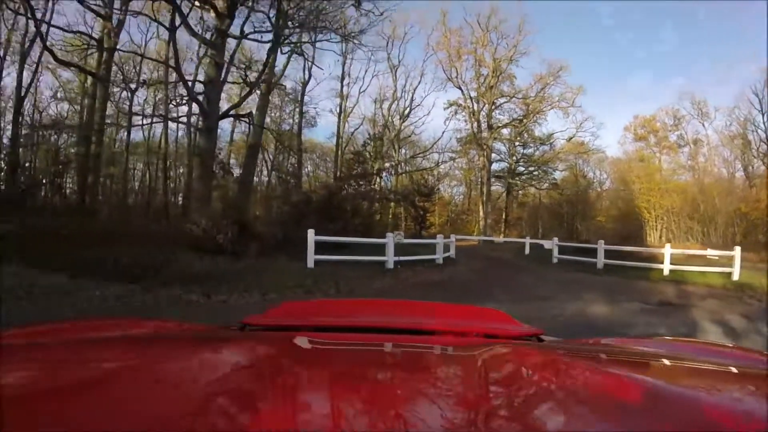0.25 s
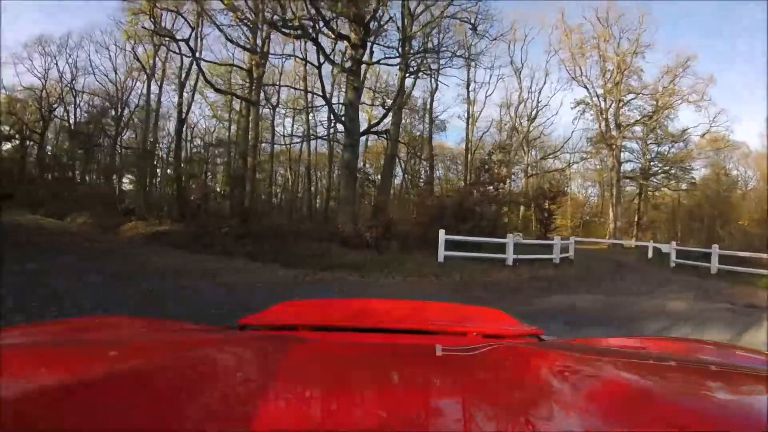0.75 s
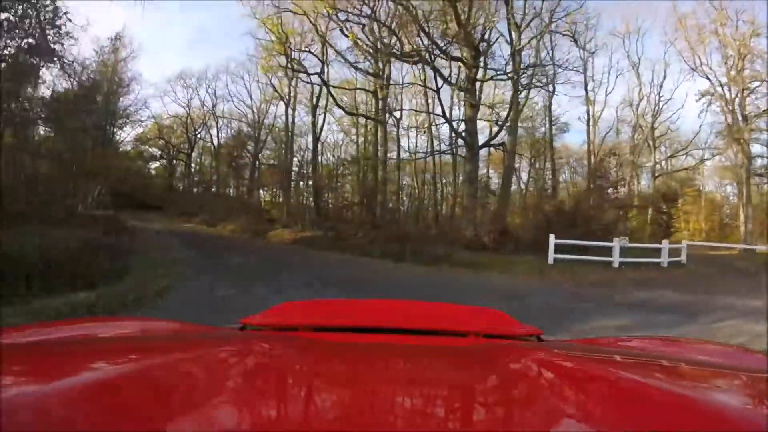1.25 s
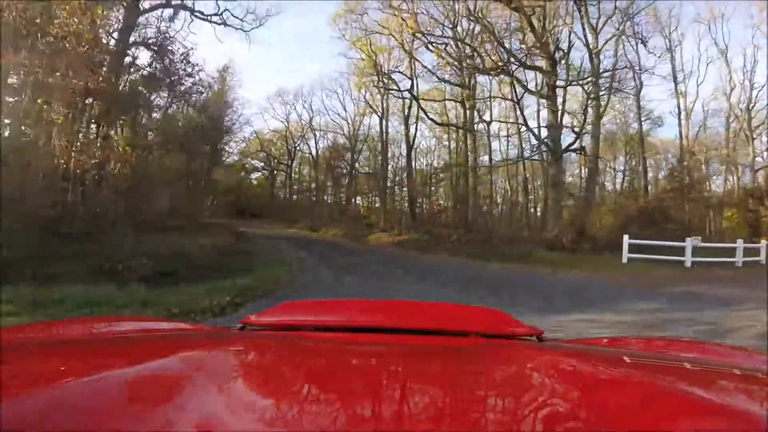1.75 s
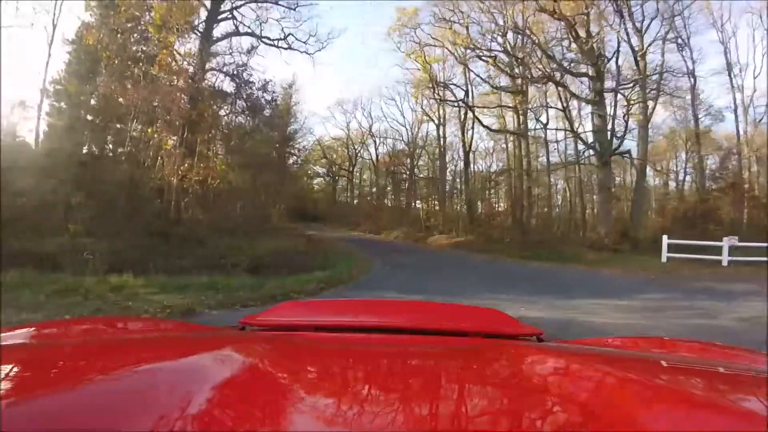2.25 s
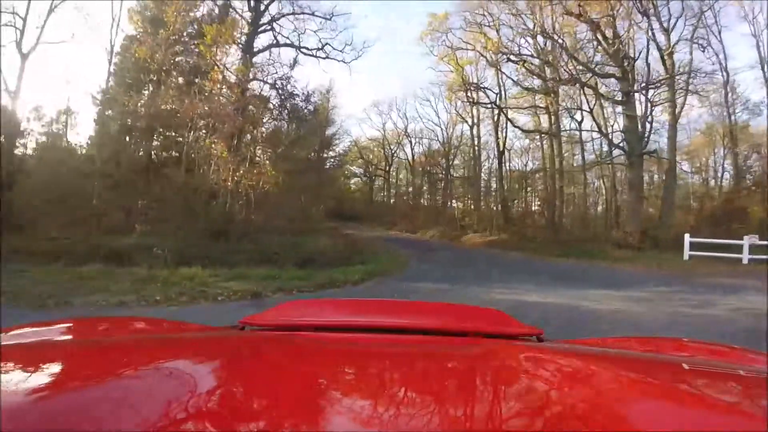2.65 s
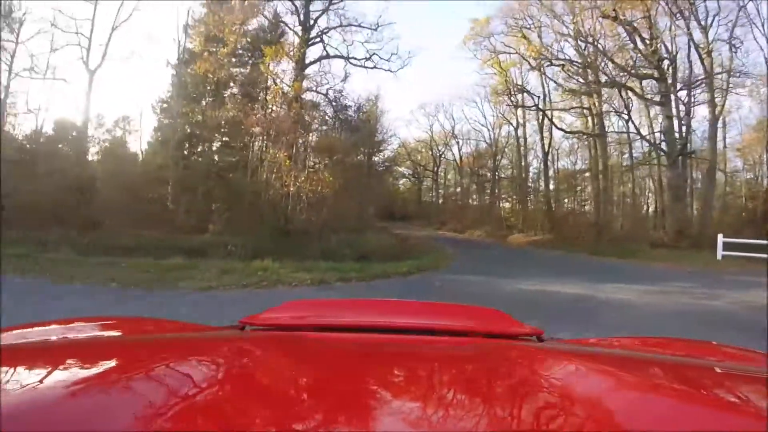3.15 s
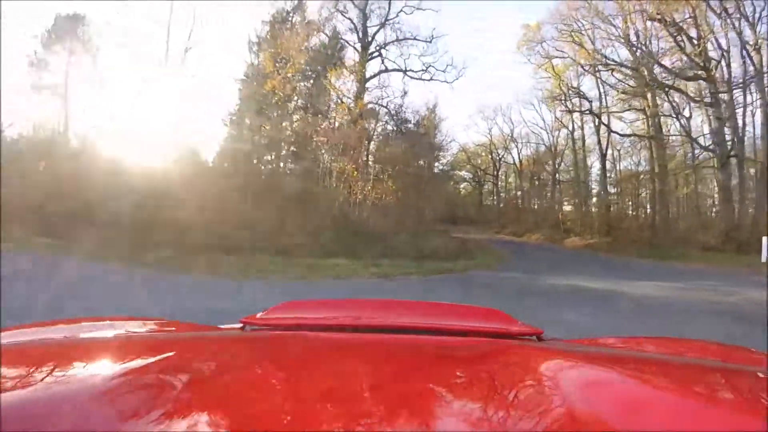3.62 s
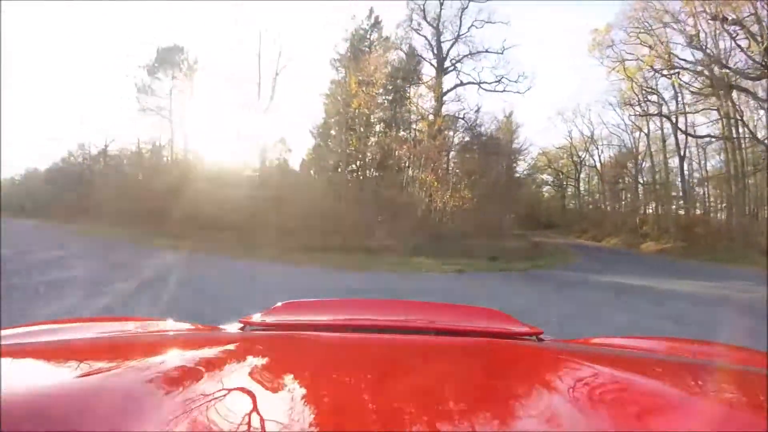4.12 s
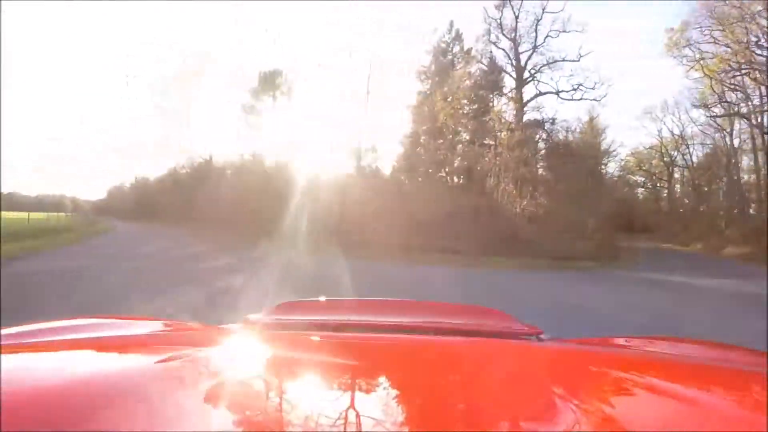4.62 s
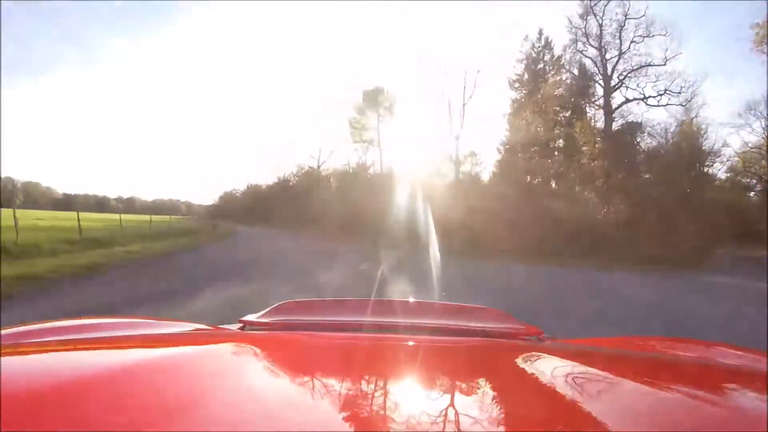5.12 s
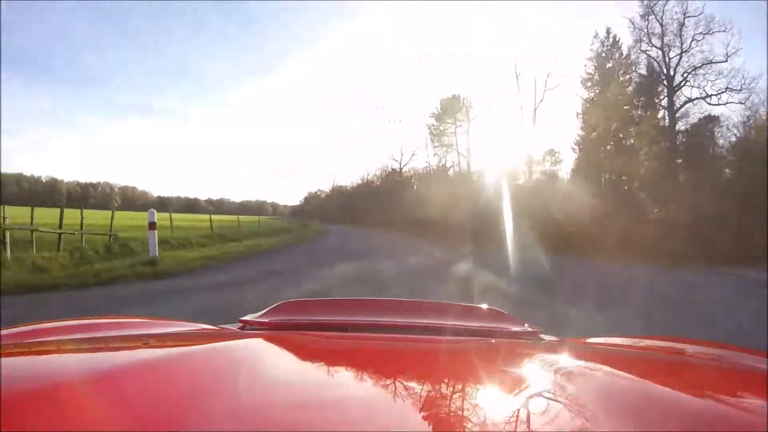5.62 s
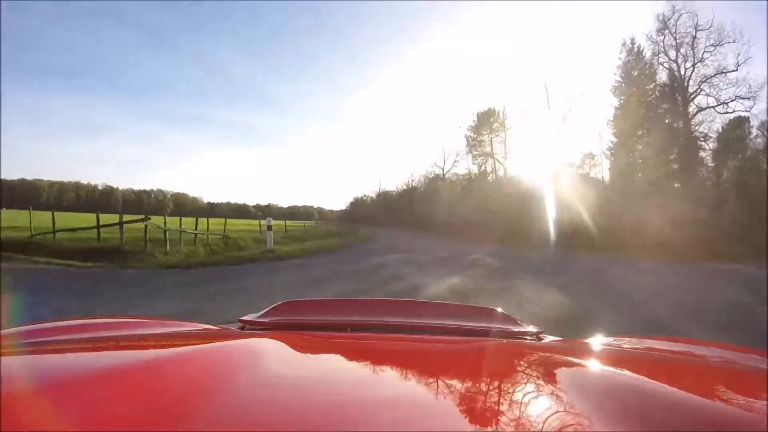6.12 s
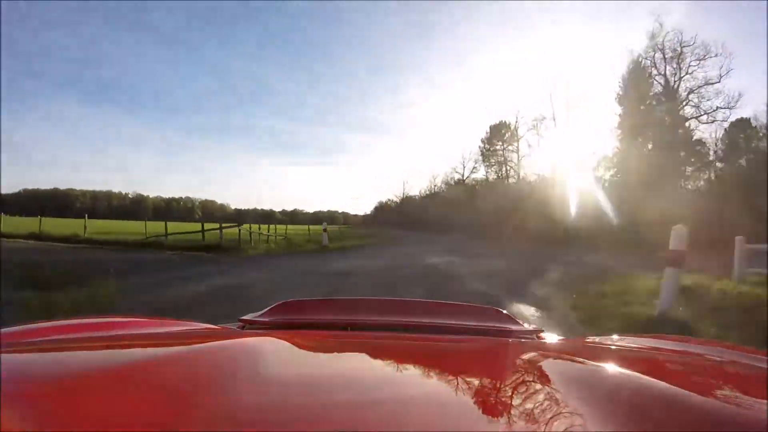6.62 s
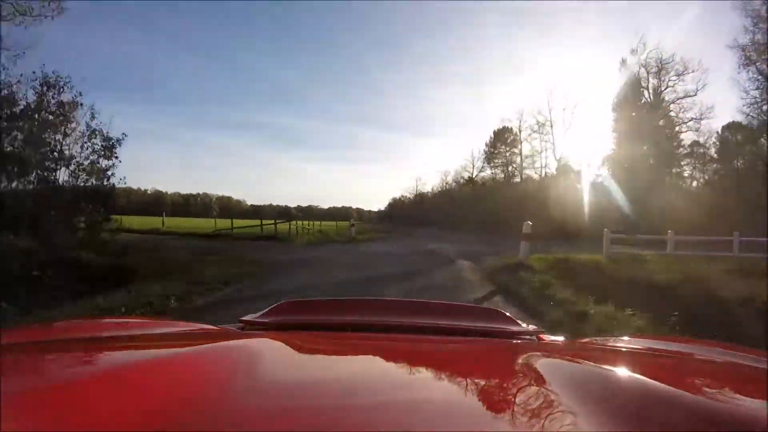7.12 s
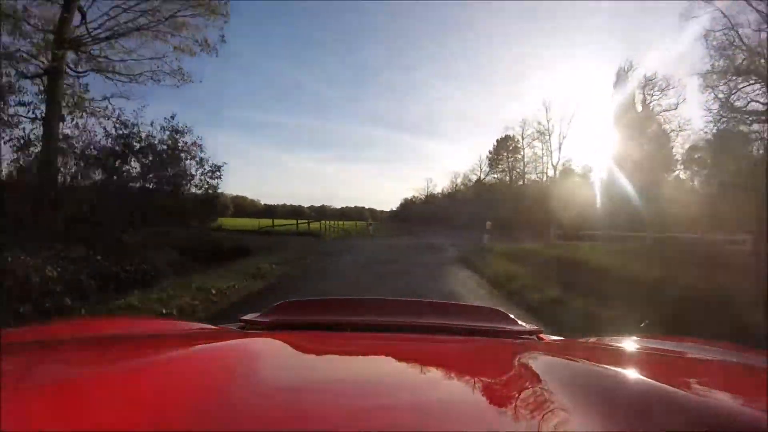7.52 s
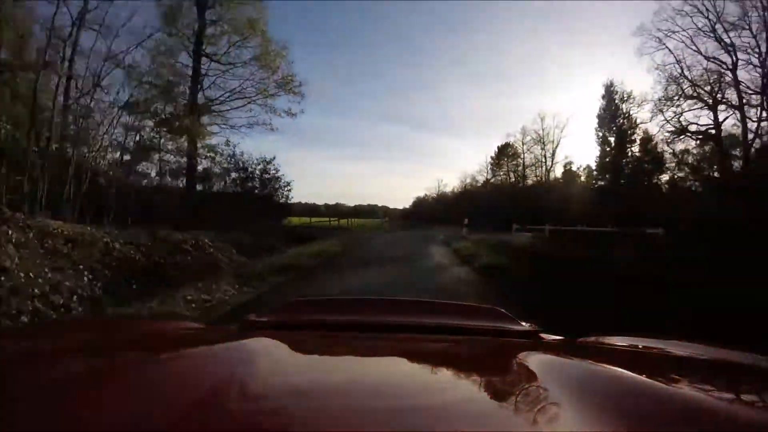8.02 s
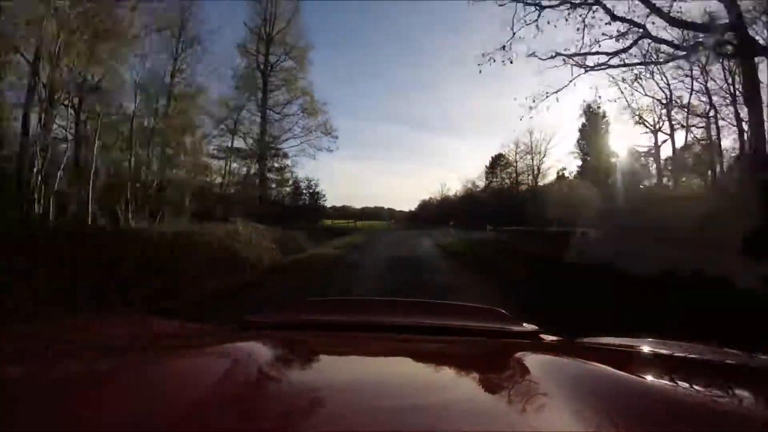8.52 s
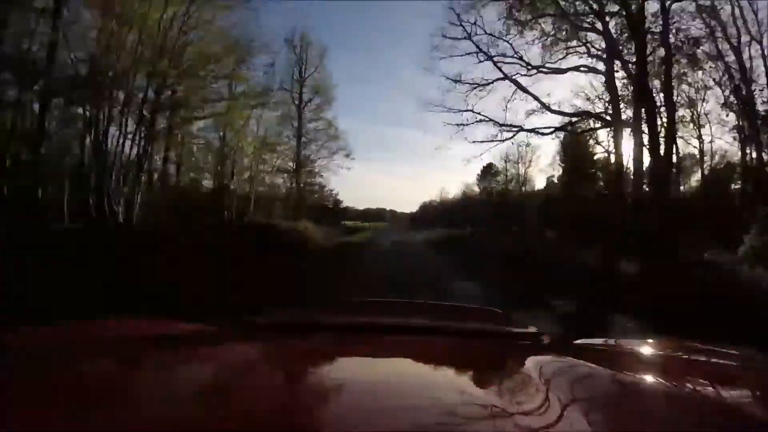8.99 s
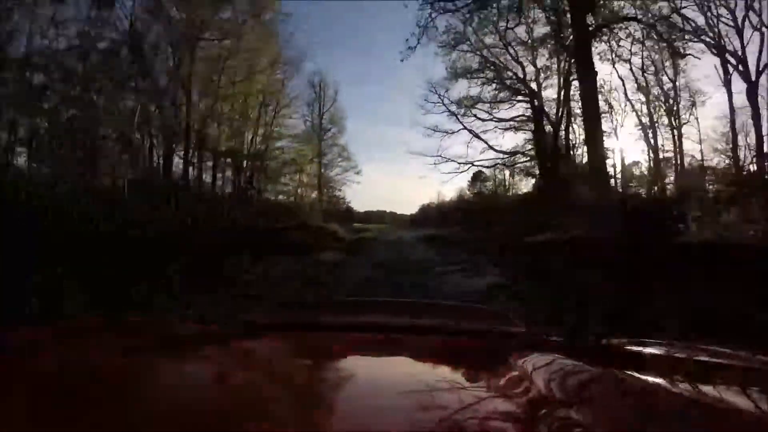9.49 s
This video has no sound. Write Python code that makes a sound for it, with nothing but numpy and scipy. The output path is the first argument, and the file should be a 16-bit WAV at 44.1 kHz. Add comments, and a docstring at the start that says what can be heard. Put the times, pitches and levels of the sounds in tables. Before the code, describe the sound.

Close, slightly boxy exterior sound of a sports car exhaust. It coasts through a turn with soft burble, buffeting wind and road rush, stutters as power returns, then accelerates strongly. The pitch falls abruptly at an upshift with a heavy pop and rattling clicks, then climbs higher, hard and hoarse, before breaking off in another lift, pops and clustered gusts.

```python
"""Sports car pulling through the gears

A six-cylinder car rolls off the power, pulls hard, shifts up and pulls again, heard by a cased camera on the body.
One exhaust bank booms as summed partials; its uneven firings are pulses ringing the pipe and camera case.
Gas is noise puffed by each firing; pops are noise bursts. Wind blows are short sine swings with noisy edges.
A loose part ticks as double noise clicks. Buffet, rush and hiss are filtered noise moved by shared gusts."""
import sys
import numpy as np
from scipy import signal
from scipy.fft import rfft, irfft
from scipy.io import wavfile
from scipy.ndimage import uniform_filter1d

SR = 44100
rng = np.random.default_rng(int(sys.argv[2]) if len(sys.argv) > 2 else 0)


def int16_out(signal):
    """Quantize to a 16-bit WAV file."""
    q = np.round(np.clip(np.atleast_2d(signal).T, -1, 1) * 32767)
    wavfile.write(sys.argv[1], SR, q.astype(np.int16))


N = 429963
T = np.arange(N) / SR

OVERRUN_HZ, OVERRUN_DB = 66.4, 14  # above this rate a shut throttle loses this much more per octave
OFF_LOAD_LOSS_DB = 25  # rasp, crack and subtones at no load
SUBTONES_FROM_HZ, SUBTONES_FULL_HZ = 90, 136
# Engine speed. Each row: time in seconds, firing rate of one bank in Hz.
ENGINE_SPEED = [(0, 53.74), (.31, 55.1), (.43, 59.24), (.62, 57.75), (1.04, 58.2), (1.29, 56), (1.52, 47.1),
                (1.74, 41.9), (2.03, 38.36), (2.59, 36.98), (2.78, 38.22), (3.0, 45.9), (3.19, 41.67),
                (3.31, 49.2), (3.42, 54.22), (3.73, 61.8), (3.98, 67.14), (4.07, 70.2), (4.44, 81.13),
                (4.65, 83.83), (4.78, 87.2), (4.92, 92.76), (5.07, 97.14), (5.25, 103.2), (5.38, 112.8),
                (5.52, 122.1), (5.79, 140.9), (6.14, 169.4), (6.22, 173.3), (6.44, 163), (6.76, 106.6),
                (6.82, 105.8), (6.88, 118.1), (6.95, 115.6), (7.2, 126.6), (7.66, 146.5), (7.8, 154.6),
                (8.39, 180.6), (8.65, 192.2), (8.95, 208.1), (9.3, 182.4), (9.44, 185.5), (9.52, 164.4),
                (9.75, 159.1)]
# Engine load. Each row: time in seconds, load (0 none, 1 full).
ENGINE_LOAD = [(0, 0), (.7, 0.12), (1.4, 0.26), (2.0, 0.46), (3.0, 0.51), (3.19, 0.68), (3.33, 1),
               (5.3, 0.98), (6.0, 1), (6.16, 1.12), (6.28, 0.86), (6.36, 0.59), (6.44, 0.41), (6.54, 0.5),
               (6.63, .45), (6.69, 0.1), (6.74, 0.3), (6.77, 0.7), (6.81, .95), (6.85, 1.03), (7.0, 0.97),
               (8.97, 1), (9.12, 0.79), (9.22, 0.36), (9.28, 0.47), (9.36, 0.31), (9.42, 0.74),
               (9.46, 0.82), (9.505, 0.8), (9.525, 0.61), (9.57, 0.91), (9.6, 0.6), (9.68, 0.54),
               (9.75, 0.37)]


def engine():
    """One exhaust bank: periodic boom plus the ringing and gas noise of its separate firings."""
    hz, load = columns(ENGINE_SPEED) + columns(ENGINE_LOAD)
    overrun_db = OVERRUN_DB * np.maximum(np.log2(hz / OVERRUN_HZ), 0)
    fast = np.clip((hz - SUBTONES_FROM_HZ) / (SUBTONES_FULL_HZ - SUBTONES_FROM_HZ), 0, 1)
    turns = np.cumsum(hz * (1 + .004 * walk(12))) / SR  # in firings; the crank speed wavers a little
    boom = boom_tones(hz, load, overrun_db, fast, turns)
    return dips() * (np.sqrt(2) * boom + exhaust(hz, load, overrun_db, fast, turns))


# Tailpipe response. Each row: frequency in Hz, relative level in dB.
TAILPIPE = [(36, -9), (52, -7.5), (75, -11), (95, -7.5), (120, -12.5), (150, -15.5), (175, -18.5),
            (200, -17.5), (240, -17), (255, -21.5), (280, -38), (310, -23), (340, -18.5), (375, -14.5),
            (420, -22), (520, -33), (620, -8), (800, -28)]
# Boom partials at 1 to 10 times the firing rate.
# Each row: level before the tailpipe in dB, dB lost at no load, phase lead under load in rad.
PARTIALS = [(-0.5, 23.5, 0.5), (-5, 10, 1.5), (-12, 11, 4), (-23.5, 2, 6), (-25.5, -3.5, 4),
            (-31.5, -10.5, 5), (-27.5, -0.5, 4), (-27, 0, 5), (-29, -5, 4), (-34, -5, 3.5)]
# Tones at 2/3, 5/3 and 8/3 of the firing rate. Each entry: level before the tailpipe in dB.
SUBTONES_DB = [-17, -15.5, -6.5]


def boom_tones(hz, load, overrun_db, fast, turns):
    """Harmonics of the firing rate through the tailpipe; unequal firings add subtones at speed."""
    skew = np.clip((load - .5) / .4, 0, 1)  # an even swell at low load, a leaning one under load
    boom = np.zeros(N)
    for order, (db, lost_db, phase_rad) in enumerate(PARTIALS, 1):
        level_db = over_hz(TAILPIPE, order * hz) + db - (lost_db + overrun_db) * (1 - load)
        boom += undb(level_db + 0.93 * walk(30)) * np.cos(2 * np.pi * order * turns + phase_rad * skew)
    for k, db in enumerate(SUBTONES_DB, 1):
        order = k - 1 / len(CYLINDER_DB)
        level_db = over_hz(TAILPIPE, order * hz) + db - (OFF_LOAD_LOSS_DB + overrun_db) * (1 - load)
        boom += fast * undb(level_db + 2.9 * walk(15)) * np.cos(2 * np.pi * order * turns)
    return boom


BLOW_TURN = .6  # firings start this share of a boom cycle late
RASP_LAG_S = .045  # the rasp returns a moment after the boom when the throttle opens
FLARE_DB, FLARE_TURNS = 7, 1.9  # gas flare after the strongest firing, its decay constant in firings
CRACK_TOP_SHARE = .6  # of the strongest firing in the high case modes
RUSTLE_DB = -.5  # against the gas
# Exhaust pipe modes. Each row: frequency in Hz, width in Hz, relative level in dB.
PIPE_MODES = [(160, 98, -1.5), (364.2, 65, 4), (482, 48, -1)]
# Low camera case modes. Each row: frequency in Hz, width in Hz, relative level in dB.
CASE_LOW_MODES = [(700.5, 74, 16.5), (800, 510, -18.5), (1070, 240, -12.5), (618, 120, -1)]
# High camera case modes. Each row: frequency in Hz, width in Hz, relative level in dB.
CASE_HIGH_MODES = [(1380, 440, 0.5), (1905, 226, 7), (2620, 831, -10), (3426.7, 220, -8),
                   (4110, 700, -16.5), (5080, 410, -21)]
# Low-speed rustle modes. Each row: frequency in Hz, width in Hz, relative level in dB.
RUSTLE_MODES = [(1290, 420, -1.5), (2148, 270, -1), (2750, 490, -13)]
# Growl law: full-load level at the knee in dB, knee in Hz, dB per octave below, dB per octave above,
# dB lost at no load.
GROWL_LAW = (-25.5, 109, 9, -2, 11)
# Rasp at full load. Each row: firing rate in Hz, level in dB.
RASP_LEVEL = [(40, -52.5), (55, -41.5), (66, -32.5), (82, -32), (95, -26), (105, -15), (120, -17),
              (135, -18), (152, -18.5), (160, -18), (172, -14), (185, -21.5), (200, -17), (208, -17)]
# Broad crack of the strongest firing at full load. Each row: firing rate in Hz, level in dB.
CRACK_LEVEL = [(60, -47.5), (95, -48.5), (120, -37.5), (150, -37), (180, -29.5), (208, -28)]
# Gas noise. Each row: time in seconds, level before the swells in dB.
GAS_LEVEL = [(0, -58), (1.0, -55), (1.7, -52.5), (2.0, -56.5), (3.2, -51.5), (3.41, -47), (4.46, -47.5),
             (4.7, -51.5), (5.0, -53), (5.4, -40), (5.95, -39), (6.15, -32), (6.3, -48), (6.7, -55),
             (6.88, -37.5), (8.0, -38), (8.97, -36.5), (9.12, -44), (9.36, -60), (9.42, -48), (9.47, -41.5),
             (9.53, -45), (9.58, -43), (9.62, -47), (9.7, -48.5), (9.75, -51)]


def exhaust(hz, load, overrun_db, fast, turns):
    """Firing pulses and gas puffs ring the pipe (growl) and the case (rasp, crack and gas)."""
    turns = turns + 1 - BLOW_TURN
    uneven = np.clip((hz - 45) / 45, .15, 1)  # the cylinders differ more at speed
    shut = np.clip(1 - load, 0, 1)
    bite = np.minimum(load, np.interp(T - RASP_LAG_S, T, load))
    pulses, size = firings(hz, turns, uneven, fast * shut)
    puff = unit(size ** 0.08 * (1.5 + np.exp(-(turns % 1) / 3.1)) * rng.standard_normal(N))

    # off the power the pipe carries more loose gas than clean firing
    growl = in_band(ring(pulses + (.12 * (1 - uneven) + 1.2 * fast * shut) * puff, PIPE_MODES), 260, 500)

    # the gas roughens the ring; one more resonance makes it build gradually
    rasp = ring(pulses + (.2 + 1.2 * fast * shut) * puff, CASE_LOW_MODES)
    rasp = in_band(band(rasp, 760, 500), 550, 900)

    cycle = turns % len(CYLINDER_DB)  # firings since the strongest one
    strongest = pulses * ((cycle < .5) | (cycle > 2.9))
    crack = band(strongest, 700, 430)
    crack = in_band(signal.sosfilt(signal.butter(6, 1030, fs=SR, output="sos"), crack), 400, 1000)

    flare = np.exp(-cycle / FLARE_TURNS) * np.minimum(cycle / 0.1, 1) - .4
    flare_db = FLARE_DB * np.clip((hz - 90) / 60, 0, 1) * flare
    blast = undb(flare_db) * puff + uneven * (0.083 * pulses + CRACK_TOP_SHARE * fast * strongest)
    gas = in_band(ring(blast, CASE_HIGH_MODES) * undb(1.2 * walk(20)), 1200, 2600)
    rustle = unit(ring(rng.standard_normal(N), RUSTLE_MODES)) * undb(2.4 * walk(25))
    gas = gas + (1 - fast) * np.maximum(load, .35) * undb(RUSTLE_DB) * rustle

    bite_gain = undb(-(OFF_LOAD_LOSS_DB + .8 * overrun_db) * (1 - bite))
    hard = bite_gain * (undb(over_hz(RASP_LEVEL, hz)) * rasp + undb(over_hz(CRACK_LEVEL, hz)) * crack)
    gas_db, = columns(GAS_LEVEL)
    return undb(law_db(GROWL_LAW)) * growl + hard + undb(gas_db + swells_db()) * gas


BURBLE_DB = 6.5  # extra scatter of the firings at speed with the throttle shut
# The three unequal firings of a bank. Each entry: level at speed in dB.
CYLINDER_DB = [0, -6.5, -7.5]
# Unequal pipe lengths. Each entry: mean lag of that cylinder in seconds.
CYLINDER_LAG_S = [0, 0.00015, .0002]


def firings(hz, turns, uneven, overrun):
    """One pulse per firing, scattered in strength and lag; returns the pulses and the firing size."""
    firing = turns.astype(int)
    chance = rng.standard_normal(firing[-1] + 1)
    cylinder = firing % len(CYLINDER_DB)
    size = undb(uneven * np.array(CYLINDER_DB)[cylinder] + (1.8 + BURBLE_DB * overrun) * chance[firing])
    drift = 1 + .35 * walk(2.5)  # the lags wander slowly, shifting which orders stand out
    at = np.flatnonzero(np.diff(firing[:-1])) + 1
    lag_s = np.maximum(drift[at], 0) * np.array(CYLINDER_LAG_S)[cylinder[at]]
    place = at - (turns[at] % 1) * SR / hz[at] + SR * lag_s
    strength = size[at] / np.sqrt(hz[at])  # equal power at any speed
    pulses = np.zeros(N + SR)
    pulses[place.astype(int)] = (1 - place % 1) * strength  # each pulse is shared between two samples
    pulses[place.astype(int) + 1] = place % 1 * strength
    return -unit(pulses[:N]), size


POP_T60_S = 0.056
# Exhaust pops and barks. Each row: start in seconds, burst level in dB, treble against it in dB.
POPS = [(0.873, -25, -23), (3.396, -17, -22), (4.289, -21, -30), (4.325, -24, -34), (4.752, -24, -28),
        (6.462, -5, -35), (6.49, -14, -30), (8.132, -15, -16.5), (9.421, -17.5, -24)]


def pops():
    """Unburnt gas cracks in the pipe with a broad body; the case rings with it."""
    s, db, treble_db = np.transpose(POPS)
    t60 = np.full(len(s), POP_T60_S)
    crack = bursts(s, db, t60, 0.0042)
    treble = bursts(s, db + treble_db, 1.9 * t60, 0.0029)
    body = band(band(crack, 550, 800), 600, 1200)
    low = undb(7.5) * ring(crack, CASE_LOW_MODES) + undb(13) * ring(crack, PIPE_MODES)
    return low + undb(3.0) * body + undb(15) * ring(treble, CASE_HIGH_MODES)


# Wind blows on the case. Each row: start in seconds, swing level in dB, pitch in Hz, edge against it in dB.
WIND_BLOWS = [(0.403, -10, 110, -20), (0.52, -2, 75, -24), (0.708, -6.5, 48.5, -23), (0.819, -2.5, 53, -24),
              (0.846, -6, 37.3, -16.5), (0.868, -0.5, 121, -20.5), (0.88, -9, 152, -22),
              (1.319, -5.5, 151, -16), (1.707, -2.5, 43.94, -31), (1.718, -4.5, 126, -19.5),
              (4.599, -19, 81.5, -34.5), (4.899, -25, 91.7, -19), (6.46, -4, 128.6, -26),
              (7.468, -6.5, 53.66, -26), (7.628, -11, 42.4, -25), (7.844, -8, 94.1, -42),
              (7.89, -9, 94.85, -38), (8.1, -2, 101.8, -15.5), (8.131, -3, 75, -18),
              (8.395, -4.5, 101.3, -30), (8.473, -6, 130, -30), (8.575, -9, 111, -31),
              (9.189, -6.5, 102.9, -19.5), (9.208, -7, 100, -37), (9.315, -5.5, 59.6, -26),
              (9.39, -6.5, 37.8, -14), (9.412, -7, 160, -18), (9.421, -2, 94, -19.5), (9.51, -3.5, 87, -27),
              (9.573, -4.5, 99, -19), (9.6, -9, 89.94, -28), (9.661, -2, 123, -16.5),
              (9.669, -7.5, 59.9, -25), (9.73, -3, 37.8, -24)]


def thumps():
    """Each blow pushes the diaphragm in and back in one compact swing, with a rough broad edge."""
    swings = np.zeros(N + SR)
    for s, db, hz, _ in WIND_BLOWS:
        cycles = T[:int(2 * SR / hz)] * hz
        shape = np.sin(np.pi * cycles / 2) ** 2 * np.exp(1 - cycles / 0.8)
        i = int(s * SR)
        swings[i:i + len(cycles)] -= undb(db) * np.sin(2 * np.pi * cycles) * shape
    s, db, _, edge_db = np.transpose(WIND_BLOWS)
    edge = bursts(s, db + edge_db, np.full(len(s), .08), 0.0042)
    body = band(band(band(edge, 200, 350), 240, 500), 280, 700)
    case = undb(5.0) * ring(edge, CASE_LOW_MODES) + undb(-11.0) * ring(edge, CASE_HIGH_MODES)
    return swings[:N] + undb(26) * body + case


# Ticks placed singly, loud to faint. Each row: start in seconds, burst level in dB.
SINGLE_TICKS = [(0.7192, -48), (0.7794, -49), (1.0189, -49), (1.1542, -48), (1.5746, -49), (6.7032, -33.5),
                (6.7231, -36), (6.7447, -41), (6.763, -37), (6.7764, -44), (6.8027, -44), (6.8274, -42),
                (7.746, -43), (8.1084, -42), (8.1366, -47), (9.0565, -44), (9.1016, -43), (9.152, -42),
                (9.1897, -41), (9.2107, -47), (9.2285, -47), (9.244, -47), (9.2684, -46), (9.29, -42),
                (9.296, -42), (9.3169, -55), (9.3294, -44), (9.3461, -46), (9.3712, -49), (9.3789, -46),
                (9.4084, -52), (9.43, -43), (9.4645, -53), (9.5115, -45), (9.5452, -46), (9.578, -44),
                (9.6667, -44.5)]
# Spells of loose ticking. Each row: start in seconds, end in seconds, ticks per second, mean burst level in dB.
CHATTER = [(0.906, 1.705, 5, -55), (6.851, 9.043, 5.5, -56), (9.206, 9.644, 15, -54)]


def rattle():
    """A loose part ticks against the mount: short bright double clicks, placed singly or scattered in spells."""
    s, db = np.transpose(SINGLE_TICKS)
    for start, end, rate, mean_db in CHATTER:
        when, size = rng.random((100, 2))[:int(rate * (end - start))].T
        s = np.append(s, start + (end - start) * when)
        db = np.append(db, mean_db + 8 * (size - .5))
    ticks = bursts(s, db, np.full(len(s), .01), 0.0012)
    ticks = ticks + bursts(s + 0.0032, db, np.full(len(s), .008), 0.0027)
    bright = band(band(ticks, 5000, 5000), 5800, 9000)
    return undb(-4.0) * bright + undb(16.0) * band(band(ticks, 3600, 4300), 4000, 6500)


SWELL_RUSH_SHARE = 0.52  # of the swells, in rush and hiss
# Air levels. Each row: time in seconds, buffet before gusts in dB, hiss before gusts and swells in dB,
# gustiness 0-1.
AIR = [(0, -23, -65, 0.63), (.7, -22.5, -65, 0.9), (1.73, -22, -63, 1), (1.95, -27, -65.5, 0.51),
       (2.5, -30.5, -68, 0.4), (2.95, -30.5, -68, 0.21), (3.32, -40, -64, 0.44), (3.7, -25, -62.5, 0.48),
       (4.25, -27.5, -64, 0.54), (4.7, -20, -65, 0.51), (5.2, -29.5, -71.5, .4), (5.6, -40.5, -78, 0.35),
       (6.06, -29, -61, 0.36), (6.5, -27.5, -67.5, 0.9), (6.8, -28.5, -66.5, 0.64), (7.5, -24, -62, 0.75),
       (8.2, -22.5, -61.5, 0.69), (9.0, -24.5, -58, 0.63), (9.3, -24, -64.5, 0.81), (9.75, -26, -67, 0.9)]
# Rush spectrum. Each row: frequency in Hz, relative level in dB per Hz.
RUSH_SPECTRUM = [(24, -38), (40, -8.5), (65, -13.5), (80, -7), (102, -7.5), (194, -14), (355, -13),
                 (519, -16.5), (692, -15), (1500, -53.5), (1950, -87.5), (3300, -120)]
# Hiss spectrum. Each row: frequency in Hz, relative level in dB per Hz.
HISS_SPECTRUM = [(2800, -4), (3800, -3.5), (5000, -5), (6800, -7), (8000, -15), (10000, -19.5),
                 (13000, -30.5), (15500, -53.5)]
# Rush law: full-load level at the knee in dB, knee in Hz, dB per octave below, dB per octave above,
# dB lost at no load.
RUSH_LAW = (-29.5, 70.5, 6.5, 1, 9.5)


def air():
    """Wind buffets low, road and wind rush in the middle, a thin hiss on top; gusts move them together."""
    buffet_db, hiss_db, gustiness = columns(AIR)
    gust_db = 2 * gustiness * np.tanh(walk(14) / 2)
    buffet = in_band(band(band(rng.standard_normal(N), 26, 50), 30, 100), 12, 34)
    buffet = buffet * undb(3 * gust_db)
    rush = in_band(coloured(RUSH_SPECTRUM, 1.8, 25), 250, 500)
    hiss = in_band(coloured(HISS_SPECTRUM, 0.29, 33), 5080, 7020)
    swell_db = SWELL_RUSH_SHARE * swells_db()
    rush = undb(law_db(RUSH_LAW) + 1.9 * gust_db + swell_db) * dips() * rush
    return undb(buffet_db) * buffet + rush + undb(hiss_db + 1.8 * gust_db + swell_db) * hiss


DIP_S = 0.051  # half length
# Brief level dips of engine and rush. Each row: centre in seconds, depth in dB.
DIPS = [(7.51, 4.5), (8.198, 6), (8.84, 5)]


def dips():
    """Gain that sags for a moment at each dip."""
    return undb(-sum(db * np.exp(-((T - s) / DIP_S) ** 2) for s, db in DIPS))


# Brief swells of gas, rush and hiss. Each row: centre in seconds, rise in dB, half length in seconds.
SWELLS = [(0.751, 5, 0.066), (1.136, 4, 0.066), (1.58, 5, 0.057), (3.415, 9.5, 0.028), (3.532, 6, 0.034),
          (3.693, 5.5, 0.037), (3.84, 2, 0.029), (4.264, 4.5, .035), (4.411, 5, 0.044), (4.546, 4.5, .015)]


def swells_db():
    """Level that rises and falls around each swell."""
    return sum(db * np.exp(-((T - s) / half_s) ** 2) for s, db, half_s in SWELLS)


def law_db(law):
    """Level of a layer from engine speed and load."""
    full_db, knee_hz, below_db, above_db, lost_db = law
    octaves = np.log2(columns(ENGINE_SPEED)[0] / knee_hz)
    slope_db = np.where(octaves < 0, below_db, above_db)
    return full_db + slope_db * octaves - lost_db * (1 - columns(ENGINE_LOAD)[0])


def over_hz(points, hz):
    """A (Hz, dB) table read on a log-frequency axis."""
    at, db = np.transpose(points)
    return np.interp(np.log(hz), np.log(at), db)


def undb(db):
    """Gain of a level in dB."""
    return 10 ** (np.asarray(db) / 20)


def unit(x):
    """Scaled to rms 1."""
    return x / np.sqrt(np.mean(x ** 2))


def columns(table):
    """Each column of a time table, interpolated at every sample."""
    s, *rest = np.transpose(table)
    return [np.interp(T, s, c) for c in rest]


def band(x, hz, width_hz):
    """One resonance, gain 1 at its centre."""
    return signal.lfilter(*signal.iirpeak(hz, hz / width_hz, fs=SR), x)


def ring(x, modes):
    """Sum of steep-sided modes of alternating sign, each two resonances in series."""
    out = np.zeros(N)
    for k, (hz, width_hz, db) in enumerate(modes):
        out += (-1) ** k * undb(db) * band(band(x, hz, width_hz), hz, 2 * width_hz)
    return out


def walk(rate):
    """Random levels held 1 / rate s and slewed twice; rms 1 over the whole."""
    k = int(SR / rate)
    steps = np.repeat(rng.standard_normal(N // k + 1), k)
    return unit(uniform_filter1d(uniform_filter1d(steps, k), k)[:N])


def coloured(points, flicker_db, rate):
    """Noise of a given spectrum whose level flickers."""
    hz, db = np.transpose(points)
    f = np.maximum(np.fft.rfftfreq(N, 1 / SR), 1)
    gain = undb(np.interp(np.log(f), np.log(hz), db, -90, -90))
    return irfft(rfft(rng.standard_normal(N)) * gain, N) * undb(flicker_db * walk(rate))


def in_band(x, lo_hz, hi_hz):
    """Scaled so that the given band has rms 1."""
    part = signal.sosfilt(signal.butter(4, [lo_hz, hi_hz], "band", fs=SR, output="sos"), x)
    return x / np.sqrt(np.mean(part ** 2))


def bursts(times, dbs, t60s, rise_s):
    """Noise bursts that rise quickly and die away."""
    envelope = np.zeros(N)
    for s, db, t60 in zip(times, dbs, t60s):
        i = int(s * SR)
        t = T[:min(SR // 4, N - i)]
        envelope[i:i + SR // 4] += undb(db - 60 * t / max(t60, .002)) * np.minimum(t / rise_s, 1)
    return envelope * rng.standard_normal(N)


def scene():
    """Everything reaches the one microphone."""
    return (engine() + pops() + thumps() + rattle() + air())[None]


TOP_HZ = 15600


def record(dry):
    """The camera rounds the loudest peaks (tanh) and cuts both ends of the spectrum."""
    rounded = np.tanh(0.59 * dry) / 0.65
    x = signal.sosfilt(signal.butter(1, 9, "high", fs=SR, output="sos"), rounded)
    return signal.sosfilt(signal.ellip(8, .2, 70, TOP_HZ, fs=SR, output="sos"), x)


dry = scene()
out = record(dry)
int16_out(out)
```